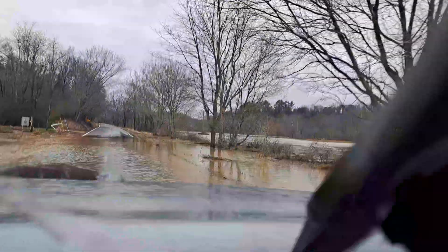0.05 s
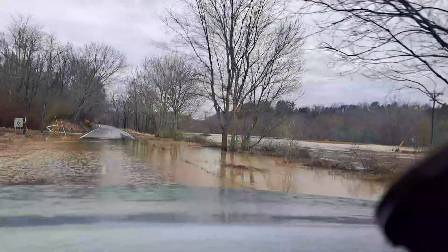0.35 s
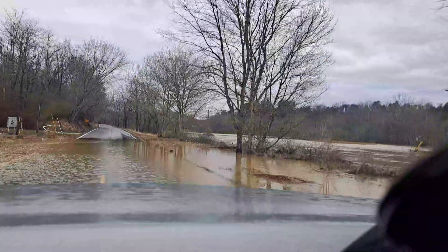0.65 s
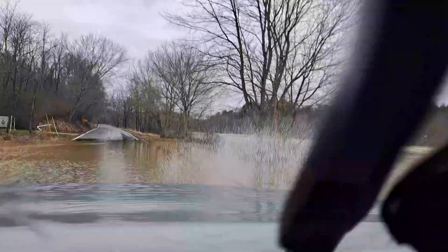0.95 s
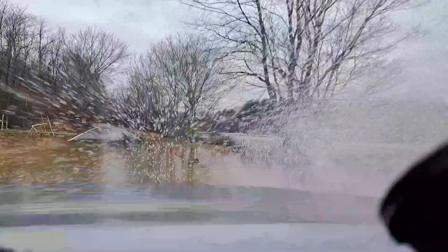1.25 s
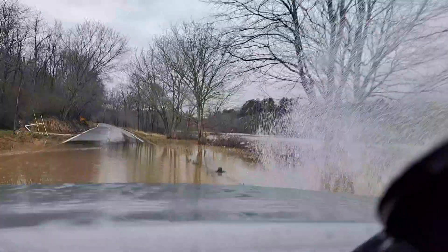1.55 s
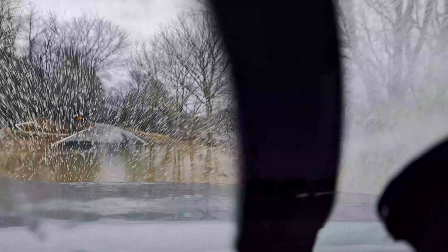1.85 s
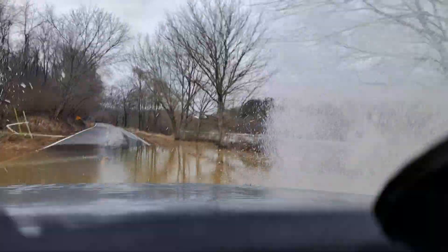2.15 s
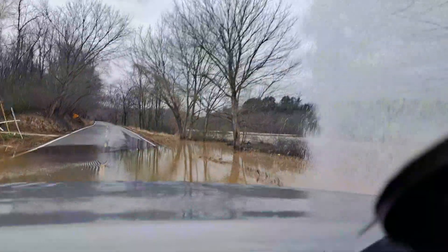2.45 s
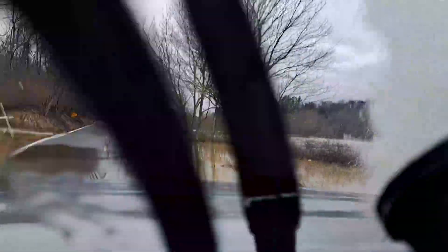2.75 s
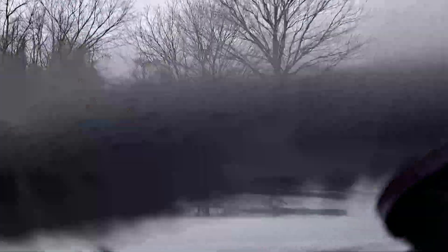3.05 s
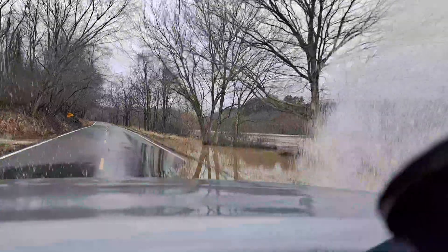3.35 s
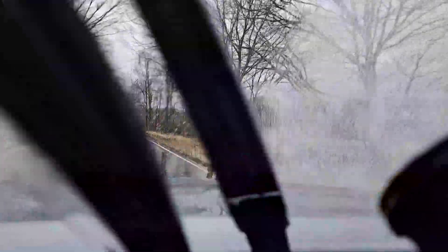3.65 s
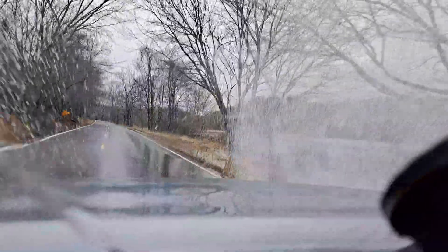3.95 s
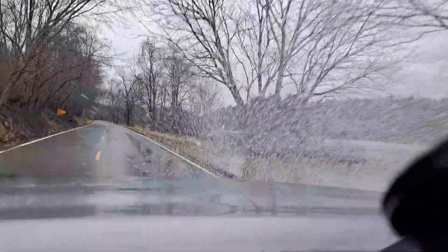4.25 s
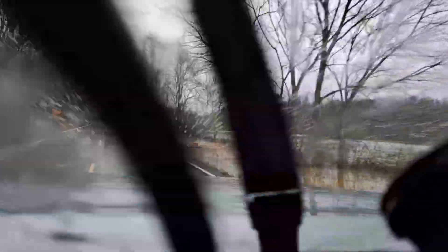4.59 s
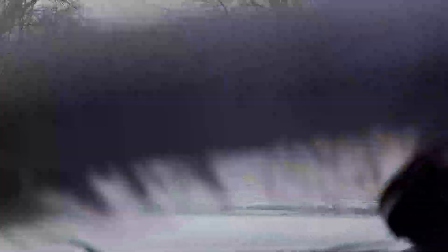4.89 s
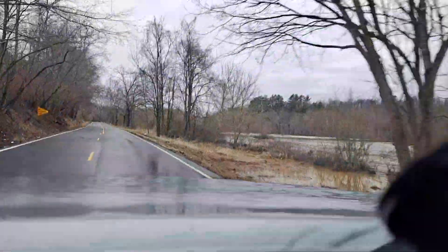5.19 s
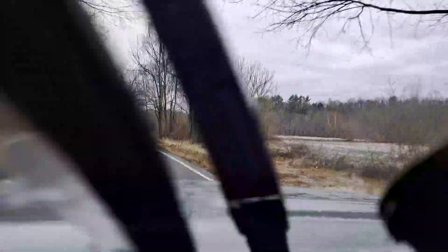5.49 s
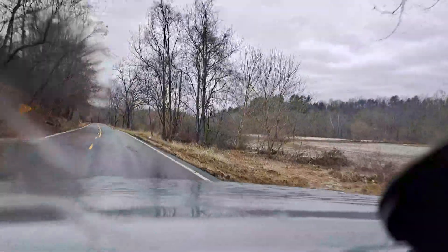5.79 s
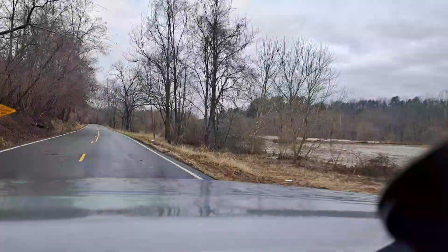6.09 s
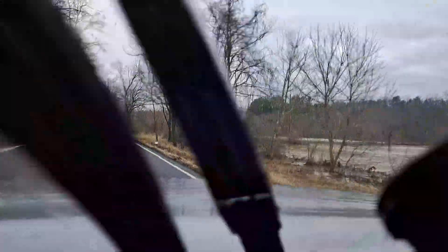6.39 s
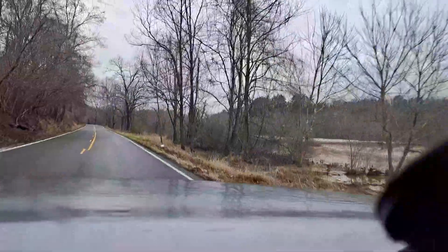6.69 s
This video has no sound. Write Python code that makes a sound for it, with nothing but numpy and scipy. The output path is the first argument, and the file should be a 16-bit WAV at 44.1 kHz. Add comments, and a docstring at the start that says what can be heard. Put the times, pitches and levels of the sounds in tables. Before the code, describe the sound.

A car drives through floodwater, heard from inside the cabin. Over a low engine drone and tyre rumble, water builds to a heavy drumming under the floor, with dull thuds and sheets of spray hitting the windshield. The water then fades and the tyres roll on with a soft wet hiss. Wiper blades slap about once a second, with faint rubber squeaks and small trim ticks close by.

```python
"""Driving through floodwater, heard inside the car.

Water pounds the floor pan and sheets of spray hit the windscreen, then the car runs out onto wet road.
Tyres rumble and hiss; the engine pulls, is slowed by the water, pulls again and shifts up.
Wiper blades slap over at the ends of their strokes; stray drops and trim tick close by."""
import sys
import numpy as np
from scipy import signal
from scipy.fft import rfft, irfft, next_fast_len
from scipy.io import wavfile

SR = 44100
rng = np.random.default_rng(int(sys.argv[2]) if len(sys.argv) > 2 else 0)


def master(y):
    """Save y as 16-bit WAV."""
    cut = np.clip(np.atleast_2d(y).T, -1, 1)
    pcm = np.round(cut * 32767)  # scale
    wavfile.write(sys.argv[1], SR, pcm.astype(np.int16))


N = 305613
T = np.arange(N) / SR

# Engine run. Each row: time in seconds, firing rate in Hz, load in dB.
ENGINE_RUN = [(0, 78.3, -30), (.5, 82.7, -28), (1, 86.25, -28), (1.5, 89.5, -30), (2, 80, -42.5),
              (3.8, 83.2, -33.5), (4.95, 92, -26), (5.2, 92.5, -34.5), (5.55, 87.8, -45), (5.95, 68.6, -32),
              (6.2, 64, -35), (6.55, 65.7, -30.5), (6.93, 67, -29)]
# Engine orders. Each row: multiple of the firing rate, level in dB.
ORDER_LEVELS = [(1, -0.5), (1.5, -23.5), (2, 0), (2.5, -13.5), (3, -6.5), (3.5, -10.5), (4, -6.5),
                (4.5, -17), (5, -11), (6, -8.5)]
# How the body passes the orders. Each row: frequency in Hz, gain in dB.
BODY_BOOM = [(66, 9), (78, -1), (84, 2.5), (92, -2), (130, 5.5), (157, 7), (175, -3.5), (200, -10.5),
             (265, 5), (310, -16.5), (370, 1.5), (410, 2.5), (460, -5), (560, -23.5)]
# Tyres. Each row: time in seconds, rumble in dB, wet hiss in dB.
TYRE_LEVELS = [(0, -25, -41.5), (.5, -22, -38.5), (1, -27, -38), (2.2, -23.5, -37.5), (3.6, -26, -44),
               (4.5, -30.5, -41.5), (5, -22, -39), (6.1, -22, -38.5), (6.93, -21.5, -42)]
# Water on the floor pan, following flood depth. Each row: time in seconds, force in dB.
FLOOD_FORCE = [(0, -23), (.5, -36.5), (.8, -23), (1.35, -16.5), (1.85, -12), (2.55, -14), (2.75, -15.5),
               (3.6, -17.5), (3.85, -21.5), (4.4, -27), (4.8, -29.5), (5.3, -37.5)]
# Heavy slugs of water. Each row: start in seconds, peak in dB.
WATER_SLUGS = [(1.266, -7), (1.825, -9), (1.925, -6), (1.944, -9), (1.99, -7), (2.145, -4), (2.261, -7),
               (2.866, -20), (3.541, -12.5), (3.717, -11.5)]
# Sheets of spray. Each row: peak time in seconds, level in dB, rise and hold in seconds.
SPRAY_SHEETS = [(.86, -44, 0.082, 0.062), (1.421, -29, 0.097, 0.063), (1.648, -41.5, .1, 0.17),
                (2.104, -37.5, 0.09, 0.044), (2.354, -42, 0.14, .06), (4.2, -39, 0.33, 0.044),
                (4.487, -36.5, 0.06, 0.32), (4.667, -37.5, 0.039, 0.11), (5.48, -44.5, .13, 0.034)]
# Trim ticks. Each row: start in seconds, left peak in dB.
TRIM_TICKS = [(.041, -29), (.277, -27.5), (.749, -28), (3.015, -29), (3.111, -22.5), (3.276, -26.5),
              (4.813, -21), (5.099, -27), (5.491, -20.5), (5.69, -23.5)]
# Drops and rubber chirps. Each row: time in seconds, level in dB, pitch and width in Hz,
# spread in seconds, left over right in dB.
GLASS_CHIRPS = [(0.233, -44, 2180, 500, 0.0042, -3), (.438, -42, 2280, 610, .006, 3),
                (.441, -51, 3680, 1200, 0.0067, 0), (.45, -48, 1217, 60, 0.052, -4),
                (.68, -50, 4220, 450, 0.0052, 0), (4.817, -43.5, 5300, 1400, 0.0046, 3),
                (4.957, -63.5, 6400, 2840, 0.0033, -15), (5.057, -37, 1580, 1190, 0.012, 4),
                (5.101, -46.5, 4000, 1800, .0041, 10), (5.919, -46.5, 1240, 130, .035, -7),
                (6.038, -45, 2880, 1000, 0.0038, 0), (6.331, -41.5, 2700, 550, .0018, -1),
                (6.54, -44, 2580, 550, 0.0034, 1), (6.831, -40, 1240, 79, 0.0058, -1),
                (6.872, -42, 2480, 1400, 0.0066, 3.5)]
# Blade flips. Each row: time in seconds, level in dB, spread in seconds, tilt in dB per octave,
# ring and stutter offsets in dB.
BLADE_FLIPS = [(.908, -10, 0.0045, -0.7, -3, 1), (1.832, -17.5, 0.0099, -3, -9, 1),
               (2.742, -27.5, 0.0085, -3.5, 4, 1.5), (3.651, -16, 0.0026, -2, -1.5, 0.5),
               (4.607, -18.5, 0.0085, -3, -7, 2), (5.059, -18.5, 0.0055, -8, -7, -14),
               (5.53, -20, 0.015, -13, -26, 0), (5.98, -26.5, 0.015, -6, -4, -3.5),
               (6.397, -13.5, 0.0083, -0.9, -2, 3), (6.448, -16, 0.0049, -4, -8.5, -15),
               (6.893, -25.5, 0.0092, -0.5, -13, -2)]
# Small slaps around a flip. Each row: delay in seconds, offset in dB, added tilt in dB per octave.
LIP_STUTTER = [(-.03, -7.5, -2), (-.006, -9, 0), (.007, -8, 1.5), (.02, -5.5, -5)]
# Modes of wiper arm and glass. Each row: frequency and width in Hz, relative level in dB.
ARM_GLASS_MODES = [(185.6, 29, -4), (312, 220, -5.5), (567, 80, -11), (738, 34, -10), (843, 110, -7),
                   (1036, 35, -20.5), (1240, 34, -20), (1510, 70, -24), (1960, 810, -22.5)]
# Source spectra. Each row: frequency in Hz, gain in dB.
RUMBLE_SPECTRUM = [(15, -36), (28, -19.5), (38, -1.5), (55, 0), (90, -7.5), (130, -1), (180, -10.5),
                   (280, -12.5), (430, -14.5), (600, -28), (1000, -35.5), (2000, -56.5), (8000, -100)]
HISS_SPECTRUM = [(200, -3), (500, 8), (800, 5), (1100, 0), (1500, -3.5), (2100, -3), (3000, -12),
                 (4500, -21), (5800, -26.5), (7200, -34.5), (10500, -38), (13000, -29.5), (16000, -37)]
FLOOR_SPECTRUM = [(20, -46), (45, -24), (70, -3), (100, -7), (150, 2.5), (210, -1.5), (320, -2.5),
                  (470, -10.5), (620, -18.5), (820, -29.5), (1100, -32.5), (2000, -46), (3200, -78),
                  (8000, -78.5)]
GLASS_SPECTRUM = [(200, -9), (600, 15.5), (1000, 5), (1500, 2), (2300, -4.5), (3000, -8.5), (4200, -9.5),
                  (6000, -14.5), (7200, -22), (10000, -24.5), (12500, -14.5), (16000, -32)]
TICK_SPECTRUM = [(500, -10.5), (2000, -2), (4500, 7.5), (6000, 0), (8000, -11), (11000, -12), (16000, -16)]
SLAP_SPECTRUM = [(60, -23), (170, 2.5), (500, 9.5), (900, -6), (1400, -10.5), (2200, -20.5), (3200, -32.5),
                 (6000, -39), (8000, -53), (13000, -46.5), (16000, -53)]
# Sound from all round, and from the windscreen. Each row: frequency in Hz, left-right correlation.
CABIN_CORRELATION = [(40, .97), (130, .86), (330, .83), (480, .55), (660, .05), (870, -.55), (1050, -.62),
                     (1450, -.35), (1680, 0), (1980, .52), (2400, .2), (2900, -.25), (3600, 0)]
SCREEN_CORRELATION = [(100, .9), (450, .65), (800, -.1), (1400, -.1), (2000, .3), (3600, 0)]
# Right microphone port. Each row: frequency in Hz, gain over the left in dB.
RIGHT_PORT_GAIN = [(150, 0.7), (350, -1.5), (800, 2), (2200, 2.17), (3900, 4.5), (5000, 10), (6200, 11),
                   (7400, 14.5), (8000, 10.5), (8700, -4), (9800, -0.5), (12500, 5.5), (14800, 0)]

TILT_PIVOT_HZ = 500
BURST_PEAK_S = 0.05


def amp(db):
    return 10 ** (np.asarray(db) / 20)


def unit_rms(x):
    return x / np.sqrt(np.mean(x ** 2) + 1e-20)


def curves(rows):
    """One per-sample curve for each column after the time."""
    times_s, *columns = np.transpose(rows)
    return [np.interp(T, times_s, column) for column in columns]


def at_hz(points, hz):
    """Table lookup on a log frequency axis."""
    points_hz, values = np.transpose(points)
    return np.interp(np.log(hz + 1), np.log(points_hz + 1), values)


def add(mix, start_s, sound):
    part = mix[:, max(round(start_s * SR), 0):][:, :sound.shape[1]]
    part += sound[:, :part.shape[1]]


def colour(x, spectrum, tilt_db_oct=0, size=8192):
    """Minimum-phase filter with the given spectrum and tilt."""
    hz = abs(np.fft.fftfreq(size, 1 / SR))
    octaves = np.log2(np.clip(hz, 150, 3000) / TILT_PIVOT_HZ)
    log_gain = np.log(amp(at_hz(spectrum, hz) + tilt_db_oct * octaves))
    response = np.exp(np.conj(signal.hilbert(log_gain)))
    taps = np.fft.ifft(response).real[:size // 2]
    return signal.oaconvolve(x, taps[None], axes=1)[:, :x.shape[1]]


def ring(x, hz, width_hz):
    """One resonance, unity peak gain."""
    return signal.lfilter(*signal.iirpeak(hz, hz / width_hz, SR), x)


def cabin_noise(count, correlation=CABIN_CORRELATION):
    """Stereo white noise, correlated by frequency."""
    size = next_fast_len(count)
    left, independent = rfft(rng.standard_normal((2, size)))
    shared = at_hz(correlation, np.fft.rfftfreq(size, 1 / SR))
    right = shared * left + np.sqrt(1 - shared ** 2) * independent
    return irfft(np.array([left, right]), size)[:, :count]


def drift(lo_hz, hi_hz):
    """Slow random wander, rms 1."""
    t = T[::64]
    rates_hz = np.geomspace(lo_hz, hi_hz, 24)
    waves = sum(np.sin(2 * np.pi * (hz * t + rng.random())) / np.sqrt(hz) for hz in rates_hz)
    return np.interp(T, t, unit_rms(waves))


def impacts(per_s, spread_db, decay_s, wash):
    """Random puffs over steady noise; wash is the steady-to-puff power ratio."""
    sizes = amp(spread_db * np.minimum(rng.exponential(1, N), 4))
    hits = sizes * (rng.random(N) < per_s / SR)
    power = signal.lfilter([1], [1, -np.exp(-1 / (decay_s * SR))], hits ** 2)
    return cabin_noise(N) * np.sqrt(power / power.mean() + wash)


def swell(peak_s, rise_s, fall_s, hold_s=0):
    """Exponential rise to 1, hold, exponential fall."""
    rising = (T - peak_s) / rise_s
    falling = (peak_s + hold_s - T) / fall_s
    return np.exp(np.minimum(0, np.minimum(rising, falling)))


def burst(spread_s, size=10000):
    """Noise burst from the windscreen; falls more slowly than it rises."""
    from_peak = (np.arange(size) / SR - BURST_PEAK_S) / spread_s
    skewed = from_peak * np.where(from_peak < 0, 1.3, .9)
    return cabin_noise(size, SCREEN_CORRELATION) / np.cosh(np.clip(skewed, -40, 40))


def at_level(x, db, spread_s):
    """Scale a burst to the energy of that rms level held for twice its spread."""
    energy = np.mean(np.sum(x ** 2, axis=1))
    return amp(db) * x * np.sqrt(2 * spread_s * SR / energy)


def engine():
    """Slightly unsteady firing orders follow the load and swell as they cross the body's booms."""
    firing_hz, load_db = curves(ENGINE_RUN)
    cycles = np.cumsum(firing_hz * (1 + .002 * drift(2, 15))) / SR
    out, flutter_db = np.zeros(N), .4
    for order, order_db in ORDER_LEVELS:
        boom_db = at_hz(BODY_BOOM, order * firing_hz)
        level_db = load_db + order_db + boom_db + flutter_db * drift(2.5, 15)
        out += amp(level_db) * np.sqrt(2) * np.sin(2 * np.pi * (order * cycles + rng.random()))
    return out


def tyres():
    """Road rumble through the body; tread hiss on wet asphalt."""
    rumble_db, hiss_db = curves(TYRE_LEVELS)
    rumble = unit_rms(colour(cabin_noise(N), RUMBLE_SPECTRUM))
    tread = impacts(per_s=2000, spread_db=5, decay_s=.0016, wash=2.4)
    hiss = unit_rms(colour(tread, HISS_SPECTRUM))
    return amp(rumble_db) * rumble + amp(hiss_db) * hiss


def flood():
    """Water drums on floor pan and wheel arches, with a few dull, heavy slugs."""
    force_db, = curves(FLOOD_FORCE)
    panel_db, surge_db = -2, .75
    drumming = colour(impacts(per_s=650, spread_db=1.5, decay_s=.0013, wash=.87), FLOOR_SPECTRUM)
    panel = amp(panel_db) * ring(drumming, hz=840, width_hz=45)
    out = amp(force_db + surge_db * drift(1.999, 6.2)) * unit_rms(drumming + panel)
    thud = colour(signal.unit_impulse((1, 3000)), FLOOR_SPECTRUM, tilt_db_oct=-2)
    for start_s, peak_db in WATER_SLUGS:
        add(out, start_s, amp(peak_db) * thud / abs(thud).max())
    return out


def spray():
    """Fine drops hit the glass as mist and in sheets; stronger sheets add more ringing splatter."""
    flood_db, = curves(FLOOD_FORCE)
    mist_db, mist_db_per_flood_db, fall_per_rise = -41.5, .33, .55
    gust_db, splatter_db, splatter_exponent = .7, -2, .4
    sheet_power = sum((amp(db) * swell(peak_s, rise_s, fall_per_rise * rise_s, hold_s)) ** 2
                      for peak_s, db, rise_s, hold_s in SPRAY_SHEETS)
    mist = amp(mist_db + mist_db_per_flood_db * flood_db)
    force = np.hypot(np.sqrt(sheet_power), mist)
    patter = colour(impacts(per_s=5500, spread_db=1, decay_s=.00023, wash=.6), GLASS_SPECTRUM)
    heavy_drops = colour(impacts(per_s=300, spread_db=2, decay_s=.0036, wash=.22), GLASS_SPECTRUM)
    splatter_gain = amp(splatter_db) * (force / force.max()) ** splatter_exponent
    splatter = splatter_gain * unit_rms(ring(heavy_drops, hz=2300, width_hz=890))
    return force * amp(gust_db * drift(5.1, 30)) * (unit_rms(patter) + splatter)


def trim_ticks():
    """Trim clicks near the left port, faint and late at the right."""
    out, far_db, lag_samples = np.zeros((2, N)), -16, 24
    click = colour(signal.unit_impulse(400)[None], TICK_SPECTRUM)[0]
    pair = np.array([click, amp(far_db) * np.roll(click, lag_samples)]) / abs(click).max()
    for start_s, peak_db in TRIM_TICKS:
        add(out, start_s, amp(peak_db) * pair)
    return out


def drops_and_chirps():
    """Drops tap and rubber squeaks on the glass; a few faint, high strays land early at random."""
    out = np.zeros((2, N))
    stray_count, until_s, stray_db, slope_db_oct = 9, .63, -56, -16
    lowest_hz, stray_width_hz, stray_spread_s = 3960, 750, .0035
    strays = [(when * until_s, stray_db + slope_db_oct * octaves, lowest_hz * 2 ** octaves,
               stray_width_hz, stray_spread_s, 0) for when, octaves in rng.random((stray_count, 2))]
    for time_s, db, hz, width_hz, spread_s, pan_db in GLASS_CHIRPS + strays:
        note = ring(ring(burst(spread_s), hz, width_hz), hz, width_hz)
        pan = amp([[pan_db / 2], [-pan_db / 2]])
        add(out, time_s - BURST_PEAK_S, at_level(note, db, spread_s) * pan)
    return out


def rubber_slap(db, spread_s, tilt_db_oct, ring_db):
    """A soft slap rings arm and glass; a harder flip favours the high modes."""
    push = colour(burst(spread_s), SLAP_SPECTRUM, tilt_db_oct)
    sound = at_level(push, db, spread_s)
    for hz, width_hz, mode_db in ARM_GLASS_MODES:
        level_db = db + ring_db + mode_db + tilt_db_oct * np.log2(hz / TILT_PIVOT_HZ)
        mode = ring(ring(push, hz, width_hz), hz, hz / 2)
        sound += at_level(mode, level_db, spread_s)
    return sound


def wipers():
    """The rubber lip flips at each stroke's end, stuttering as it catches, slips and settles."""
    out = np.zeros((2, N))
    for time_s, db, spread_s, tilt_db_oct, ring_db, stutter_db in BLADE_FLIPS:
        start_s = time_s - BURST_PEAK_S
        add(out, start_s, rubber_slap(db, spread_s, tilt_db_oct, ring_db))
        for delay_s, offset_db, added_db_oct in LIP_STUTTER:
            slip = rubber_slap(db + stutter_db + offset_db, spread_s, tilt_db_oct + added_db_oct, ring_db)
            add(out, start_s + delay_s, slip)
    return out


def whistle():
    """A thin, very high hiss swells and fades on the open road."""
    level_db, hz, width_hz = -71.5, 13200, 900
    hiss = ring(ring(cabin_noise(N), hz, width_hz), hz, width_hz)
    return amp(level_db) * swell(peak_s=6.3, rise_s=1.5, fall_s=.34) * unit_rms(hiss)


def scene():
    return engine() + tyres() + flood() + spray() + wipers() + drops_and_chirps() + trim_ticks() + whistle()


def record(dry):
    """Treble resonances of the right port, then a low-pass on both channels."""
    cutoff_hz = 15800
    ports = np.vstack([dry[:1], colour(dry[1:], RIGHT_PORT_GAIN)])
    lowpass = signal.firwin(511, cutoff_hz, window=("kaiser", 9), fs=SR)
    return signal.oaconvolve(ports, lowpass[None], "same")


dry = scene()
out = record(dry)
master(out)
```